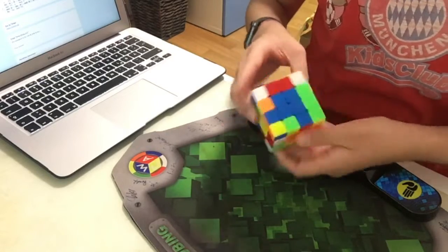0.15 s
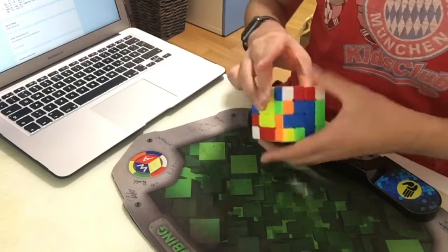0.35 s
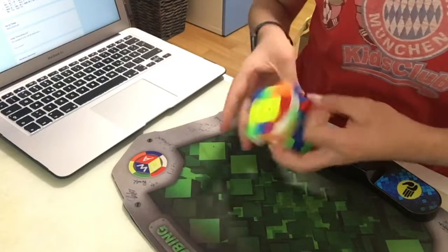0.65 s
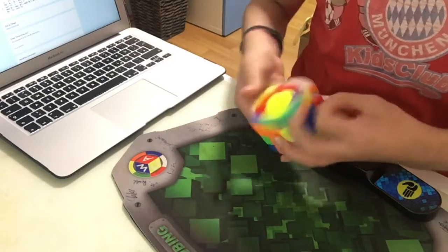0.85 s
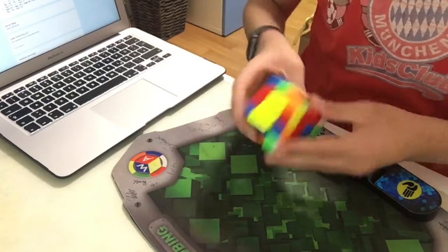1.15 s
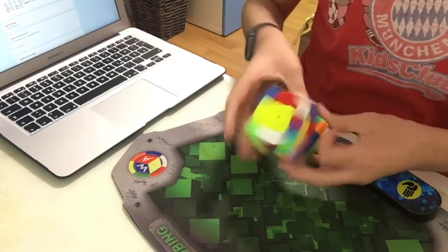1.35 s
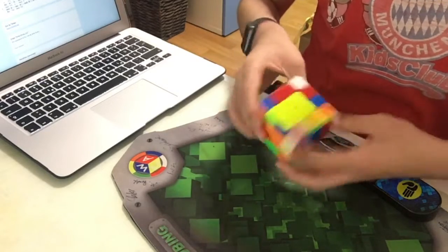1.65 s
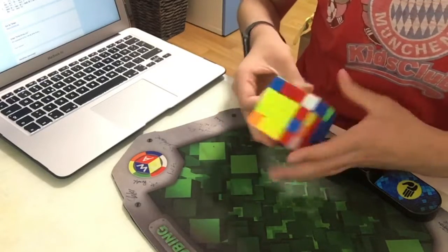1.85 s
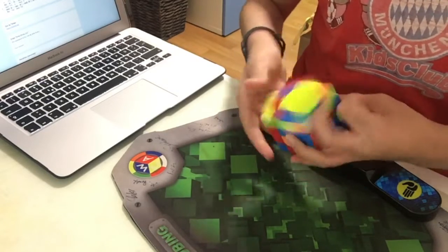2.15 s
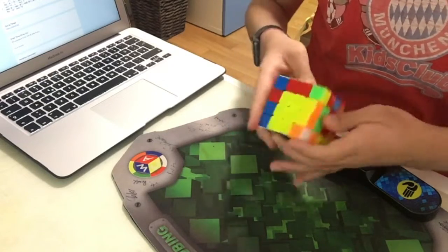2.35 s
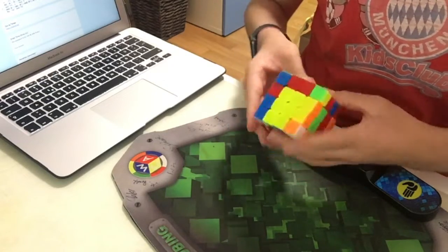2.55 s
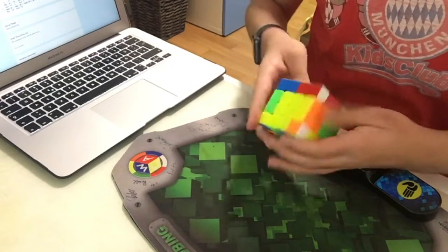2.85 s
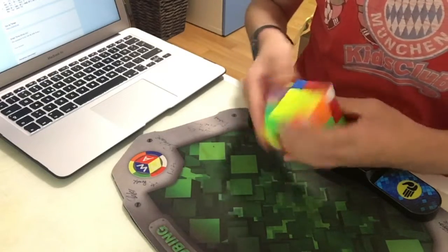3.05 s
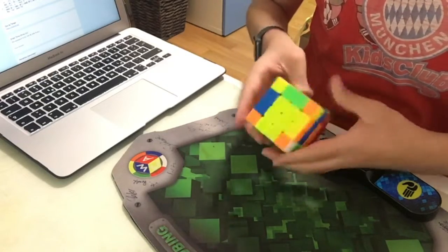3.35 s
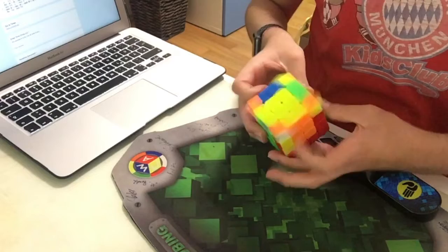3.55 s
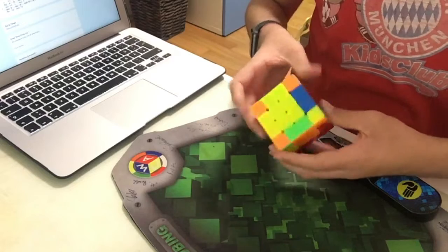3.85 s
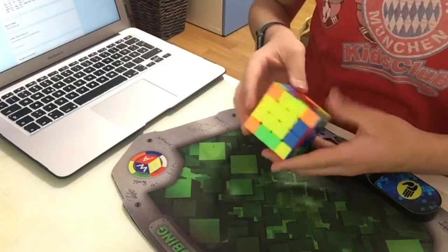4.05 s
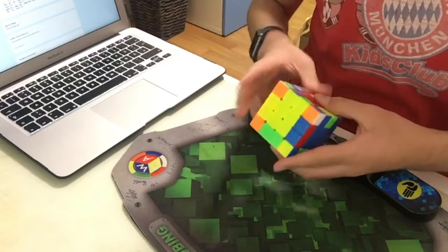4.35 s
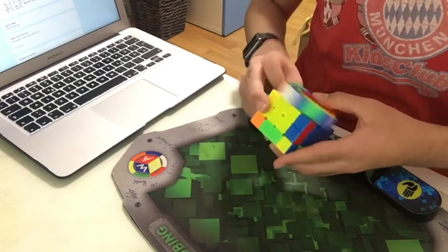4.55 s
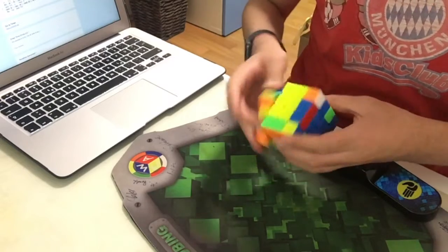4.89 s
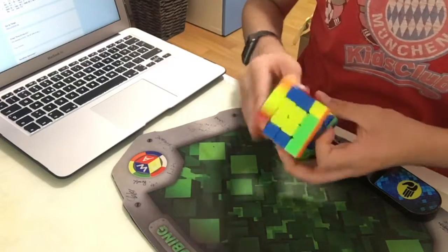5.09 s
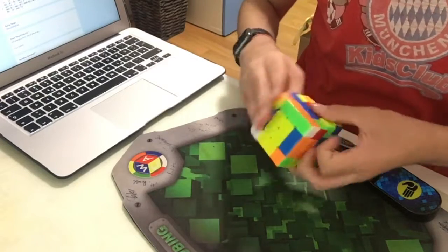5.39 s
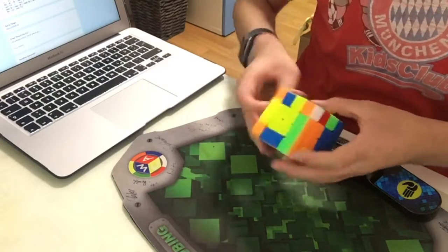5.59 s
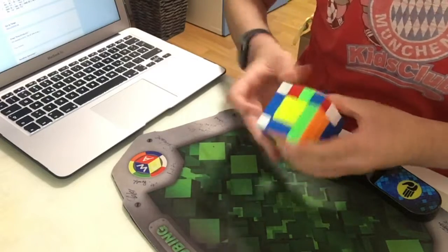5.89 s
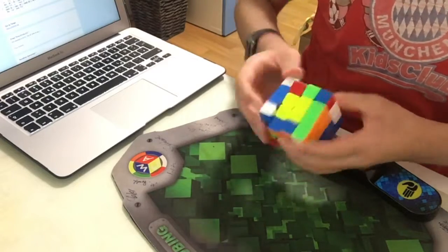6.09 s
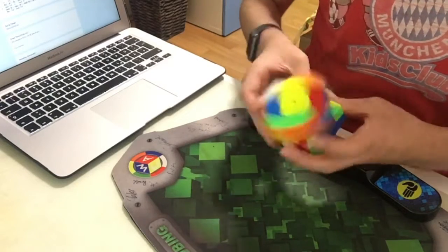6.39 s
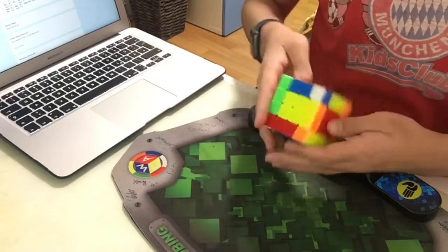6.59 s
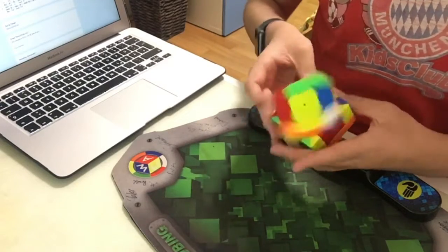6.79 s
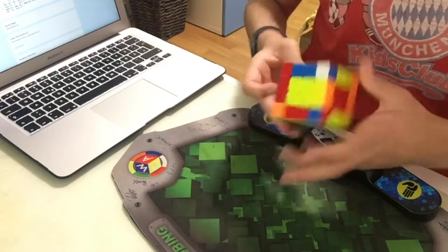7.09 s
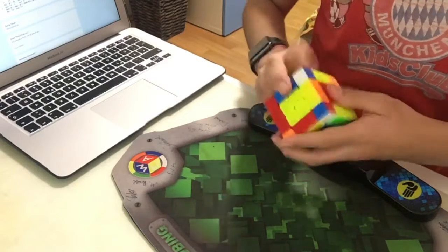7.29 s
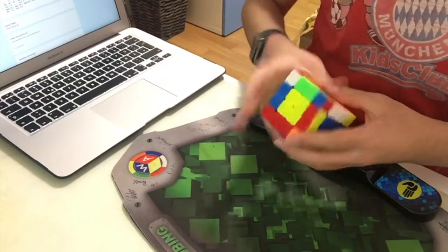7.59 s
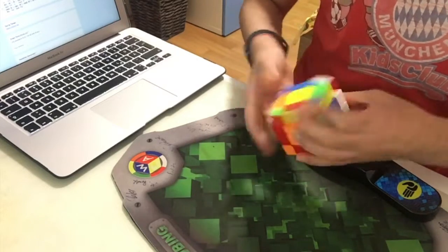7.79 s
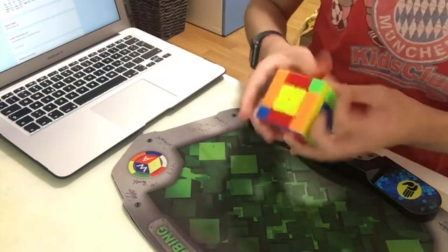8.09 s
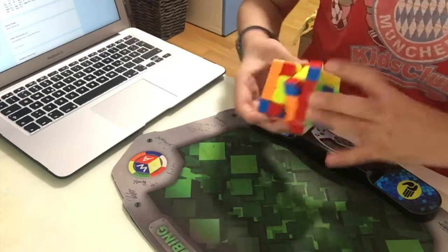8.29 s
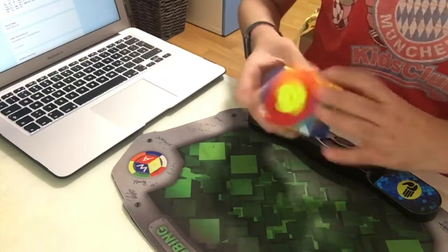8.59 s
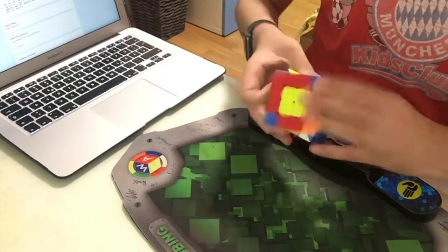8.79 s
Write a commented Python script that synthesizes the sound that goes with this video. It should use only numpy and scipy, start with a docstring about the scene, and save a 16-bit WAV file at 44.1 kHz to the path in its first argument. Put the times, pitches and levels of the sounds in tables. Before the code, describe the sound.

A plastic puzzle cube is twisted in quick clicking, clacking runs with brief pauses, close by in a small lively room.

```python
"""A small, lively room: a plastic puzzle cube is twisted in quick runs over a desk, close to a phone.
Each layer breaks free with a click, chatters as its hollow pieces pass each other, and lands with a clack.
Extra clacks fall at, within and between the turns, loose pieces tick, and closing gaps chirr upwards.
Each contact rings crowded modes, and a diffuse echo of decaying noise follows the cube; beneath lie
shaped air noise, a wavering hum, and a few soft bumps that set the desk's low modes booming."""
import sys
import numpy as np
from scipy import signal
from scipy.fft import rfft, irfft
from scipy.io import wavfile
from scipy.ndimage import uniform_filter1d

SR = 44100
rng = np.random.default_rng(int(sys.argv[2]) if len(sys.argv) > 2 else 0)


def output_pcm(signal):
    """Save a mono or channel-first signal as 16-bit PCM at the path in sys.argv[1].

    Samples are clipped to [-1, 1] before scaling.
    """
    pcm = np.clip(np.atleast_2d(signal).T, -1, 1) * 32767
    wavfile.write(sys.argv[1], SR, np.round(pcm).astype(np.int16))


N = 394254

# still air, spectral density before levelling: [f/Hz, relative level/dB]
AIR_SPECTRUM = [(20, -20), (45, -2.5), (120, 0), (250, -8), (800, -10.5), (2500, -19), (7000, -26.5),
                (15000, -31)]
# strength of the many close modes of the hollow pieces, before detuning: [f/Hz, relative level/dB]
PIECE_SPECTRUM = [(250, -22.5), (500, -22.5), (850, -17), (1250, -7), (1550, -7.5), (2480, 6), (2900, -2.5),
                  (3900, -1.5), (5000, -6), (7000, -3.5), (8200, -9), (10300, -10.5), (11500, -9),
                  (15500, -13)]
# extra clacks: some sharpen the start of a turn, others fall within or between turns: [t/s, level/dB]
EXTRA_CLACKS = [(0.092, -55), (0.238, -71.5), (0.307, -65.5), (0.604, -43), (0.869, -33), (1.124, -50.5),
                (1.22, -37), (1.4, -28.5), (1.673, -46), (1.996, -41.5), (2.097, -35.5), (2.146, -30),
                (2.356, -47), (2.474, -61), (2.509, -62.5), (2.623, -30), (2.631, -28), (2.705, -33.5),
                (2.829, -47), (3.282, -53.5), (3.413, -56), (3.699, -40.5), (3.952, -62), (3.99, -54.5),
                (4.537, -46.5), (4.676, -55.5), (4.752, -56), (5.306, -43), (5.478, -34), (5.839, -49.5),
                (5.907, -40.5), (6.076, -32), (6.234, -35.5), (6.26, -31), (6.412, -34), (6.534, -45),
                (6.764, -60), (6.928, -36.5), (7.177, -49), (7.212, -55), (7.293, -43), (7.3007, -42),
                (7.391, -51.5), (7.409, -44.5), (7.475, -40), (7.506, -37.5), (7.806, -31), (7.819, -32.5),
                (7.932, -37), (8.354, -47), (8.779, -37.5), (8.607, -29.5)]
# one flick of a layer, from breaking free to landing in line:
# [start t/s, landing t/s, chatter level/dB, landing level/dB, brightness/dB per octave]
TURNS = [(0.597, 0.619, -50.5, -40, 0), (0.666, 0.7, -50.5, -40, -1), (0.797, 0.836, -53, -52, -1.5),
         (0.868, 0.947, -45.5, -36.5, 1), (0.975, 1.02, -43.5, -50, 2), (1.182, 1.269, -40.5, -42.5, 0),
         (1.31, 1.391, -41.5, -25, 2.5), (1.472, 1.54, -46.5, -39, 2.5), (1.647, 1.688, -41, -33, -1),
         (1.771, 1.851, -46, -39.5, 1.5), (1.997, 2.062, -56.5, -44, 0), (2.143, 2.169, -40.5, -32.5, -0.5),
         (2.227, 2.256, -40.5, -33.5, 1), (2.605, 2.648, -39, -26, 1), (3.05, 3.102, -41, -28.5, 0.5),
         (3.148, 3.165, -42.5, -39.5, 0), (3.429, 3.455, -45, -38, 0.5), (3.506, 3.58, -49.5, -36.5, 2),
         (3.7, 3.737, -50, -40, 0), (4.528, 4.554, -55, -46, -2.5), (4.784, 4.858, -52, -42, -2),
         (4.942, 4.975, -46.5, -31, -0.5), (5.099, 5.152, -48.5, -53, 0), (5.242, 5.31, -53.5, -32, 1),
         (5.431, 5.484, -48.5, -35, 2.5), (5.509, 5.553, -46, -48, 1), (5.616, 5.628, -48.5, -40, 0.5),
         (5.734, 5.768, -50.5, -53, -1.5), (5.951, 5.99, -46, -45, -1.5), (6.044, 6.092, -46, -32, 2.5),
         (6.118, 6.153, -44, -38, 0.5), (6.216, 6.297, -44.5, -32, 3), (6.383, 6.442, -52, -38.5, 3),
         (6.762, 6.82, -56.5, -42.5, -2.5), (6.91, 6.989, -42.5, -32.5, .5), (7.476, 7.539, -46.5, -43, 0),
         (7.689, 7.784, -44, -44, 0.5), (7.807, 7.869, -45.5, -38, -0.5), (7.929, 7.974, -49.5, -39, -0.5),
         (8.05, 8.066, -43.5, -42, 0.5), (8.158, 8.192, -45, -36, 1), (8.351, 8.392, -54, -43, -0.5),
         (8.481, 8.514, -56, -55, -1.5), (8.554, 8.627, -44, -32.5, 2), (8.773, 8.801, -45, -39, 2),
         (8.86, 8.901, -42.5, -28.5, .5)]
# soft bumps against the desk: [t/s, level/dB, length/s]
BUMPS = [(0.156, -53.5, .16), (4.56, -66, 0.16), (5.166, -66, 0.17)]
# the desk's low modes: [f/Hz, relative level/dB]
DESK_MODES = [(62, 0.5), (125, -11.5)]
# the room's echo, before levelling: [f/Hz, relative level/dB, t60/s]
ROOM_ECHO = [(256, 4.5, 0.59), (1150, 9, 0.48), (2540, 1, 0.35), (7000, 1, 0.37), (15300, 4, 0.21)]
# gaps between pieces squeezing shut with a rising, hollow chirr: [start t/s, level midway/dB]
CLOSING_GAPS = [(0.992, -42), (2.603, -38), (6.388, -37.5)]
# brightness of the light contacts, dull to crisp [dB per octave]
PIECE_TILTS = np.linspace(-6, 6, 80)
# time axis of one contact [s]
RING = np.arange(900) / SR

AIR_DB, HUM_HZ, HUM_DB = -76.5, 59.3, -83
PHONE_LOW_HZ, PHONE_TOP_HZ = 25, 15800
# every layer breaks free with a click of this level, and rattles on this long after it lands
BREAKAWAY_DB, SETTLE_S = -46.5, 0.024
# a blow of FIRM_DB has the colour of its turn; each dB more brightens it by this many dB per octave
FIRM_DB, BRIGHTENING = -38, 0.14


def undb(db):
    """Decibels to gain."""
    return 10 ** (np.asarray(db) / 20)


def unit(x):
    """Scale to rms 1."""
    return x / np.sqrt(np.mean(x ** 2))


def fade(t, t60):
    """Exponential decay, 60 dB down after t60."""
    return np.exp(-np.log(1000) * t / t60)


def add(track, s, sound):
    """Mix a two-row sound into the track at time s."""
    i = int(np.clip(s * SR, 0, N))
    track[:, i:i + sound.shape[1]] += sound[:, :N - i]


def at_hz(hz, points, values):
    """Read a table along a log-frequency axis."""
    return np.interp(np.log(np.maximum(hz, 1)), np.log(points), values)


def walk(rate):
    """Smooth random wandering of rms 1, with a new target rate times a second."""
    k = int(SR / rate)
    steps = np.repeat(rng.standard_normal(N // k + 1), k)
    return unit(uniform_filter1d(steps, k)[:N])


def background(waver_db=3.5, drift=0.042):
    """Still air is shaped noise; the low hum is a sine that wavers in pitch and level."""
    hz = np.arange(N // 2 + 1) * SR / N
    shape = undb(at_hz(hz, *np.transpose(AIR_SPECTRUM)))
    air = irfft(rfft(rng.standard_normal(N)) * shape, N)
    clock = np.cumsum(1 + drift * walk(12.0)) / SR
    hum = np.sin(2 * np.pi * HUM_HZ * clock) * undb(waver_db * walk(10))
    return undb(AIR_DB) * unit(air) + undb(HUM_DB) * unit(hum)


def clack(tilt_db, ring_t60=0.023, damping=0.22, seat_s=0.00053, scatter_db=2, detune=0.044,
          hollow_hz=2800, hollow_range=0.51, hollow_db=8, hollow_width=0.17, count=180):
    """One contact rings a piece's crowded modes: a direct row for the phone, a spread row for the room."""
    place, phase = rng.random((2, count))
    points, db = np.transpose(PIECE_SPECTRUM)
    points = points * np.exp(detune * rng.standard_normal())  # every piece is pitched a little differently
    pocket_hz = hollow_hz * np.exp(hollow_range * rng.standard_normal())

    def colour(hz):
        """Harder contacts are brighter; the air pocket between the pieces adds its own resonance."""
        bright_db = tilt_db * np.log2(np.clip(hz, 2000, 9000) / 2000)
        pocket_db = hollow_db / (1 + (np.log(hz / pocket_hz) / hollow_width) ** 2)
        return undb(at_hz(hz, points, db) + bright_db + pocket_db)

    # one mode at a random place in each slot, slots even in root frequency
    low, high = np.sqrt(points[[0, -1]])
    hz = (low + (high - low) * (np.arange(count) + place) / count) ** 2
    t60 = ring_t60 * (2000 / hz) ** damping  # ring_t60 holds at 2 kHz
    modes = np.sin(2 * np.pi * (np.outer(hz, RING) + phase[:, None])) * fade(RING, t60[:, None])
    # the faces scuff into their seat within a millisecond or so
    seating = 1 - np.exp(-RING / (seat_s * np.exp(0.5 * rng.standard_normal())))
    strengths = colour(hz) * undb(scatter_db * rng.standard_normal(count))
    direct = seating * (strengths @ modes)
    direct /= np.sqrt(np.mean(direct[:SR // 200] ** 2))  # rms 1 over the first 5 ms
    # summed over all directions the modes blend into a smooth spectrum
    mode_power = colour(hz) ** 2 * t60 / np.sqrt(hz)
    power = np.interp(np.fft.rfftfreq(len(RING), 1 / SR), hz, mode_power, left=0)
    spread = np.roll(irfft(np.sqrt(power)), SR // 1000) * fade(RING, ring_t60)
    spread *= np.linalg.norm(direct) / np.linalg.norm(spread)  # same energy as the direct sound
    return np.array([direct, spread])


def small_pieces(ring_t60=0.02, ring_spread=0.35, pocket_hz=3100, pocket_range=0.52, pocket_db=10.5):
    """Light contacts all over the cube, dull to crisp, some damped by the fingers, with strong air pockets."""
    pieces = []
    for tilt_db in PIECE_TILTS:
        t60 = ring_t60 * np.exp(ring_spread * rng.standard_normal())
        pieces.append(clack(tilt_db, ring_t60=t60, hollow_hz=pocket_hz,
                            hollow_range=pocket_range, hollow_db=pocket_db))
    return pieces


def pick(pieces, tilt_db, variety_db=2.24):
    """Any light contact of about this brightness."""
    wanted_db = tilt_db + variety_db * rng.standard_normal()
    return pieces[np.argmin(abs(PIECE_TILTS - wanted_db))]


def loose_ticks(pieces, rate=60, rest_db=-79, busy_db=-61, spread_db=5.5, settle_s=0.26, tilt_db=-3.5):
    """Loose pieces tick as the grip shifts: faintly at rest, louder around the turns."""
    t = np.arange(N) / SR
    turning = sum((t > start) & (t < landing + SETTLE_S) for start, landing, *_ in TURNS).astype(float)
    busy = np.minimum(2 * uniform_filter1d(turning, int(settle_s * SR)), 1)
    out = np.zeros((2, N))
    for i in rng.integers(N, size=int(rate * N / SR)):
        db = rest_db + (busy_db - rest_db) * busy[i] + spread_db * rng.standard_normal()
        add(out, t[i], undb(db) * pick(pieces, tilt_db))
    return out


def blows():
    """All the hard contacts as (s, dB): each turn breaks free and lands, and the extra clacks join in."""
    breakaways = [(start, BREAKAWAY_DB) for start, *_ in TURNS]
    landings = [(landing, db) for _, landing, _, db, _ in TURNS]
    return breakaways + landings + list(EXTRA_CLACKS)


def clacks(graze_db=-10, rebound_db=-9.0, stagger_s=0.005):
    """No blow falls flat: a neighbour grazes first, the main blow falls, and the neighbour rebounds."""
    _, landings, _, _, tilts = np.transpose(TURNS)
    out = np.zeros((2, N))
    for s, db in blows():
        blow = undb(db)
        turn_tilt_db = tilts[np.argmin(abs(landings - s))]  # colour of the turn landing nearest
        tilt_db = turn_tilt_db + BRIGHTENING * (db - FIRM_DB)
        early, late = stagger_s * rng.random(2)
        neighbour = clack(tilt_db)
        add(out, s - early, blow * undb(graze_db) * neighbour)
        add(out, s, blow * clack(tilt_db))
        add(out, s + late, blow * undb(rebound_db) * neighbour)
    return out


def room(x, wet_db=-5.0, build_s=0.0067, gap_s=0.0036, count=12):
    """Diffuse echo: noise bands build within milliseconds, each dying at its own rate, the top soonest."""
    t = np.arange(SR) / SR
    points, db, t60 = np.transpose(ROOM_ECHO)
    hz = np.arange(SR // 2 + 1)
    noise = rfft(rng.standard_normal(SR)) * undb(at_hz(hz, points, db))
    centres = np.geomspace(points[0], points[-1], count)
    band = at_hz(hz, centres, np.arange(count))
    tail = np.zeros(SR)
    for k, centre in enumerate(centres):
        band_gain = np.maximum(1 - abs(band - k), 0)  # overlapping triangles
        tail += irfft(noise * band_gain, SR) * fade(t, at_hz(centre, points, t60))
    tail *= np.clip((t - gap_s) / build_s, 0, 1)
    return undb(wet_db) * signal.fftconvolve(x, tail / np.linalg.norm(tail))[:N]


def bumps(rise=0.092, waver=0.0345):
    """A soft push sets the desk's low modes booming for a moment, slightly unsteady in pitch."""
    t = np.arange(N) / SR
    out = np.zeros(N)
    clock = np.cumsum(1 + waver * walk(40)) / SR
    boom = sum(undb(db) * np.sin(2 * np.pi * hz * clock) for hz, db in DESK_MODES)
    for s, db, length in BUMPS:
        swell = np.interp(t, [s, s + rise * length, s + length], [0, 1, 0])
        out += undb(db) * boom * swell
    return out


def chatter(pieces, rate=200, spread_db=5, swell_db=4, lead_s=0.022, lead_db=-29,
            ease_s=0.0027, ease_db=-19, settled_db=-5):
    """A turning layer drags its pieces over their neighbours: an uneven hail that grows, then settles."""
    out = np.zeros((2, N))
    for start, landing, db, _, tilt_db in TURNS:
        first, last = start - lead_s, landing + SETTLE_S
        n = max(int((last - first) * rate), 2)
        times = first + (last - first) * (np.arange(n) + rng.random(n)) / n
        # the fingers take up the slack just before the layer moves
        push_db = np.interp(times, [first, start - ease_s, start, (start + landing) / 2, landing, last],
                            [lead_db, ease_db, -swell_db, 0, 0, settled_db])
        uneven_db = spread_db * np.minimum(rng.standard_normal(n), 1.5)
        force = unit(undb(uneven_db + push_db))
        for s, f in zip(times, force):
            add(out, s, undb(db) * f * pick(pieces, tilt_db))
    return out


def closing_gaps(length_s=0.029, open_hz=2300, shut_hz=3500, pocket_db=17, count=7):
    """The air pocket shrinks as a layer closes, so the contacts along the way ring higher and higher."""
    out = np.zeros((2, N))
    for start, db in CLOSING_GAPS:
        for progress in (np.arange(count) + rng.random(count)) / count:
            hz = open_hz + (shut_hz - open_hz) * progress
            contact = clack(0, hollow_hz=hz, hollow_range=0, hollow_db=pocket_db)
            add(out, start + progress * length_s, undb(db) * (0.5 + progress) * contact)
    return out


def scene(bass_hz=230):
    """The cube, too small to radiate bass, with its echo, the desk bumps and the quiet room."""
    pieces = small_pieces()
    cube = loose_ticks(pieces) + clacks() + chatter(pieces) + closing_gaps()
    no_bass = signal.butter(2, bass_hz, "high", fs=SR, output="sos")
    direct, spread = signal.sosfilt(no_bass, cube)
    return (background() + direct + room(spread) + bumps())[None]


def record(dry):
    """The phone cuts the deepest bass and the top of the treble."""
    low_cut = signal.butter(2, PHONE_LOW_HZ, "high", fs=SR, output="sos")
    top_cut = signal.ellip(10, 0.2, 70, PHONE_TOP_HZ, fs=SR, output="sos")
    return signal.sosfilt(top_cut, signal.sosfilt(low_cut, dry))


dry = scene()
out = record(dry)
output_pcm(out)
```